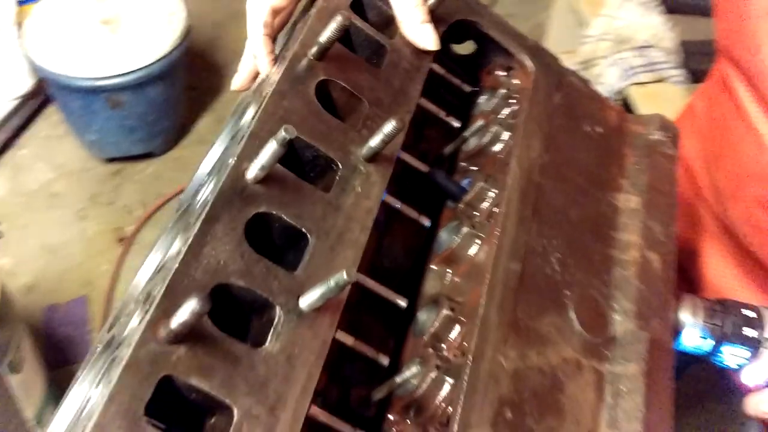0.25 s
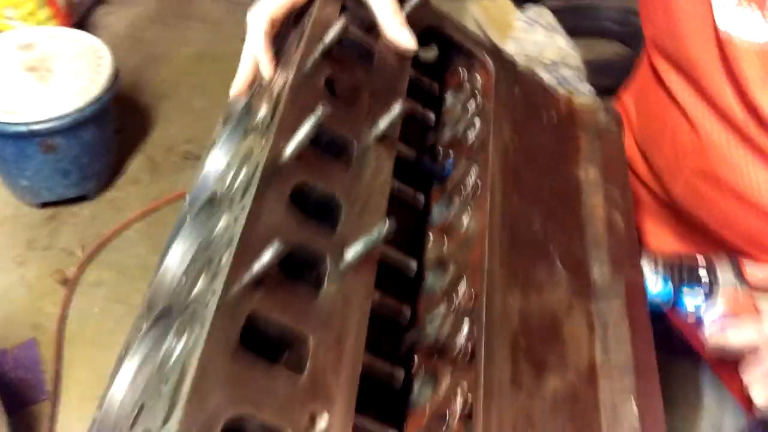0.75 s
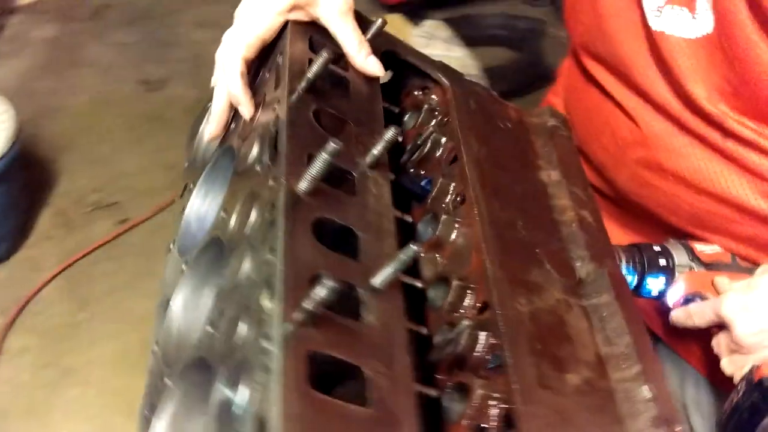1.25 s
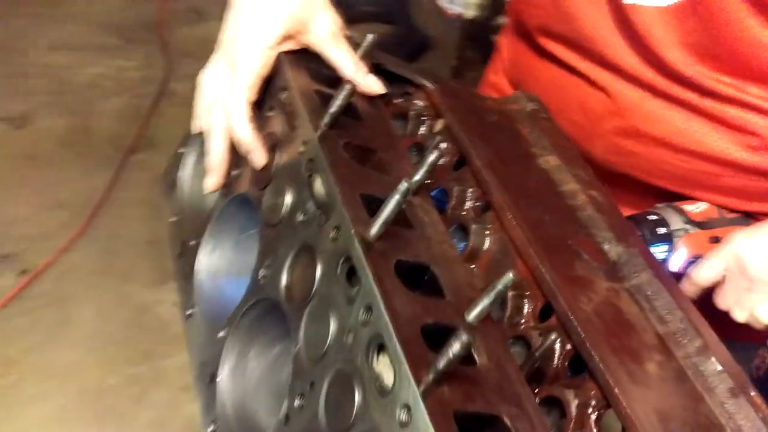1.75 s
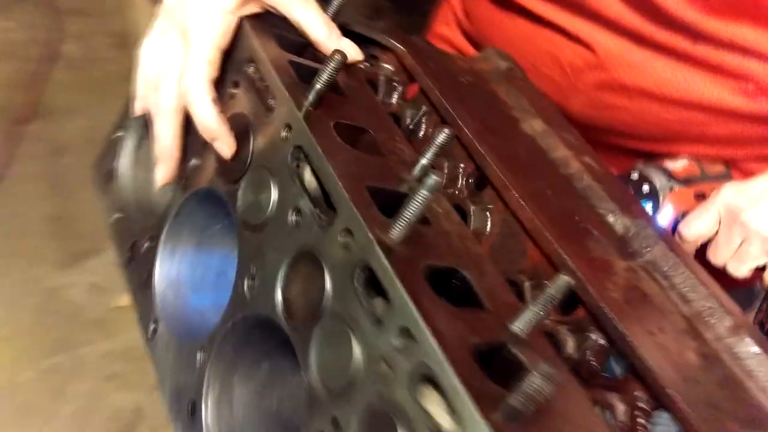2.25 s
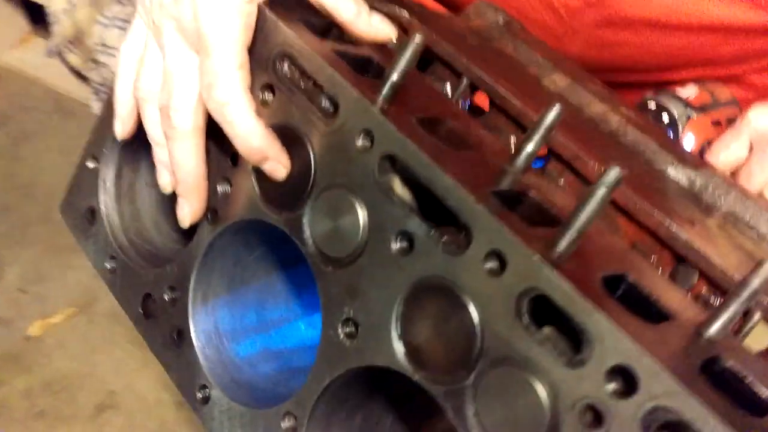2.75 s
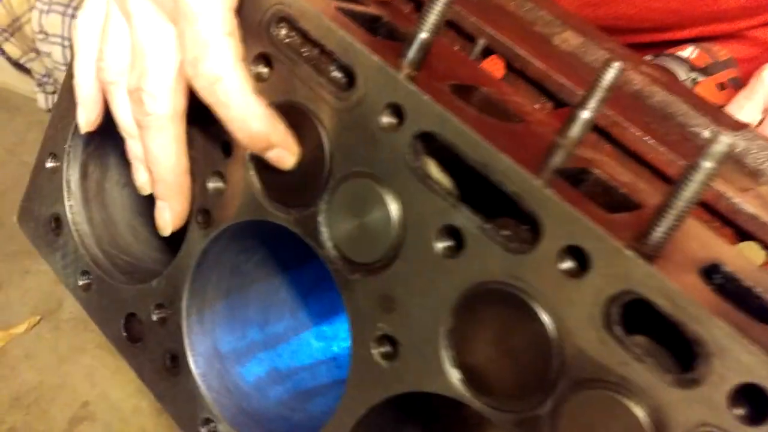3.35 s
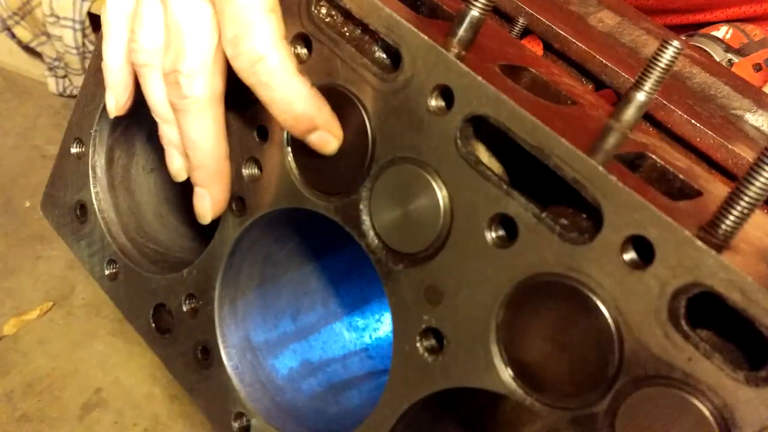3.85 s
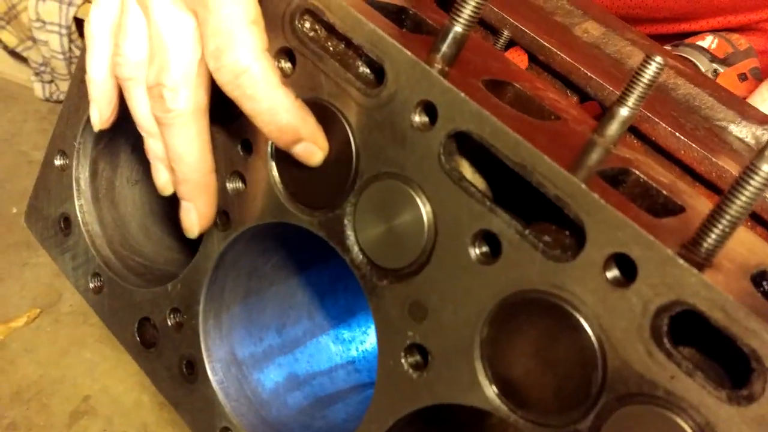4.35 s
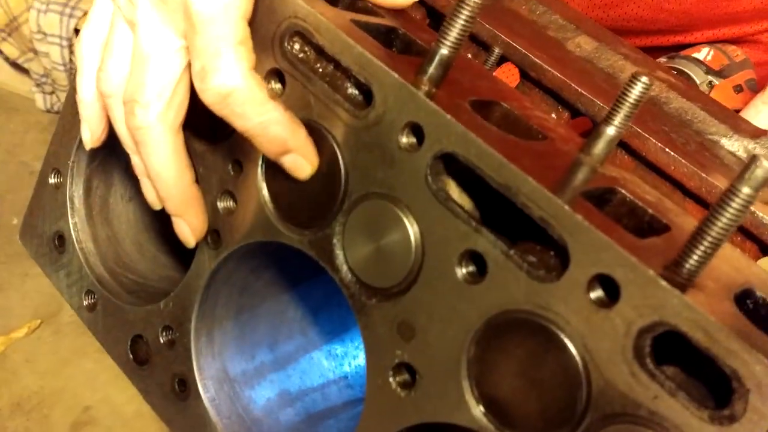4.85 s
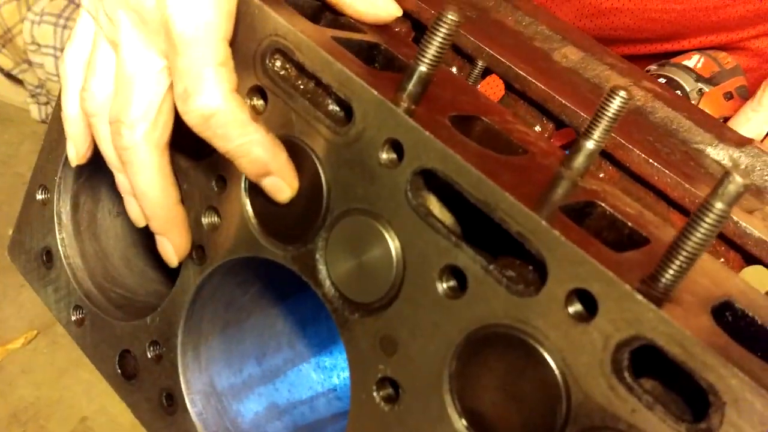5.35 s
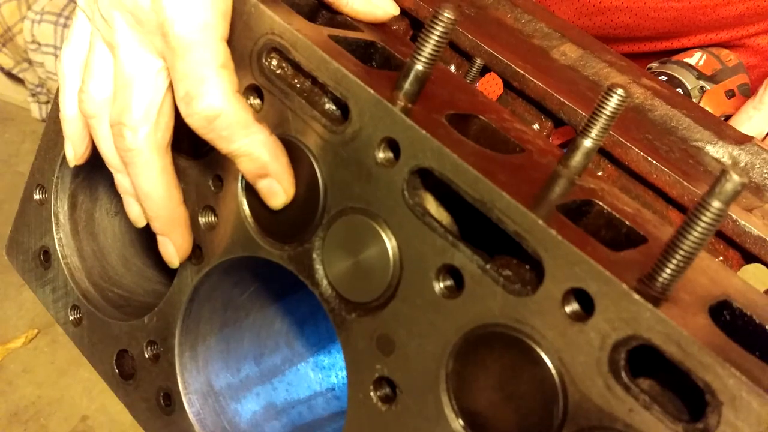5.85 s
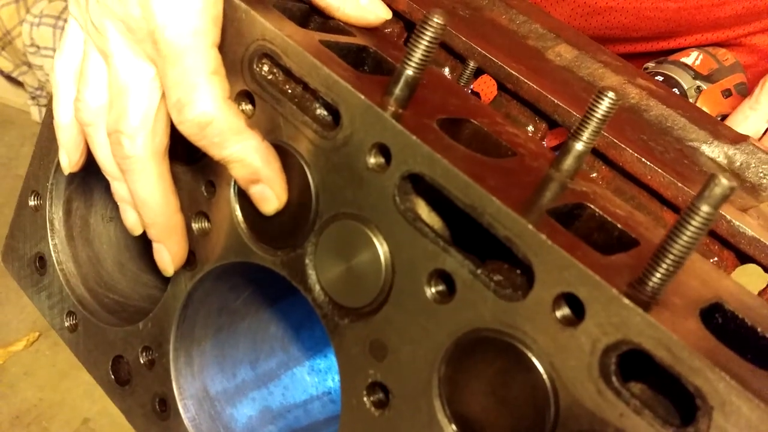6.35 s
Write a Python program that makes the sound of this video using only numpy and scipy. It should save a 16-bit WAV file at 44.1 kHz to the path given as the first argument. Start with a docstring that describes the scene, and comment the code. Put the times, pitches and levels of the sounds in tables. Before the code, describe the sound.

A cordless drill drives a honing tool inside an iron engine block, close by, with an even motor whine, a rough grinding hiss and a thin ringing tone that swells and fades. Before it starts, about two seconds in, there are only a few light shoe scrapes on concrete, a soft heel thud and small clicks over the low hum of a workshop fan. The drill then keeps running.

```python
"""A cordless drill spins up and turns a hone in the bore of an engine block.
Its motor whines at multiples of the shaft speed; brushes, fan and stones make a grinding noise,
the iron rings under the stones, and a narrow tone near 1095 Hz fades and swells. Before it starts,
shoes scuff on concrete, a heel lands and small parts tick.
A fan motor and the mains hum in the workshop throughout."""
import sys
import numpy as np
from scipy import signal
from scipy.fft import rfft, irfft, next_fast_len
from scipy.io import wavfile
from scipy.ndimage import uniform_filter1d, map_coordinates

SR = 44100
rng = np.random.default_rng(int(sys.argv[2]) if len(sys.argv) > 2 else 0)


def unload_audio(sound):
    """Save the sound as a 16-bit wav file, at the path given as the first command line argument."""
    columns = np.transpose(np.atleast_2d(sound))
    # keep every value between -1 and 1, then stretch to whole-number steps
    steps = np.round(np.clip(columns, -1, 1) * 32767)
    wavfile.write(sys.argv[1], SR, steps.astype(np.int16))


N = 290619
TIME_S = np.arange(N) / SR


def amp(db):
    """Decibels to gain."""
    return 10 ** (np.asarray(db) / 20)


def unit(x):
    """Scale to rms 1."""
    return x / np.sqrt(np.mean(x ** 2) + 1e-20)


def pan(db):
    """Stereo gains; db is left minus right."""
    return amp(np.vstack([db / 2, -db / 2]))


def along(points, hz):
    """Interpolate (frequency, value) points on a log axis."""
    freqs, values = np.transpose(points)
    return np.interp(np.log(hz + 1), np.log(freqs + 1), values)


def curves(rows):
    """One value per sample for each column after the time."""
    times, *columns = np.transpose(rows)
    return [np.interp(TIME_S, times, column) for column in columns]


def bump(centre_s, sigma_s):
    """Gaussian envelope of height 1."""
    return np.exp(-.5 * ((TIME_S - centre_s) / sigma_s) ** 2)


def wobble(rate_hz):
    """Random curve, linear between Gaussian knots."""
    knots = rng.standard_normal(int(N * rate_hz / SR) + 4)
    return map_coordinates(knots, [TIME_S * rate_hz], order=1)


def filtered(x, response):
    """Apply a complex frequency response."""
    size = next_fast_len(x.shape[-1] + 8192)
    return irfft(rfft(x, size) * response(np.fft.rfftfreq(size, 1 / SR)), size)[..., :x.shape[-1]]


def resonance(f, hz, width_hz):
    """Second-order band-pass response."""
    return 1j * f * width_hz / (hz * hz - f * f + 1j * f * width_hz)


# Left-right likeness of room noise: (frequency [Hz], correlation [1])
ROOM_COHERENCE = [(60, 0.8), (130, 0.81), (280, 0.96), (610, 0.83), (1330, 0.09), (2880, 0.091),
                  (6250, 0.1), (13600, 0.28)]


def noise(gain, length, patchy_db, coherence=ROOM_COHERENCE):
    """Shaped stereo noise of rms 1, with random time-frequency patches that dip more than they rise."""
    bins = signal.stft(rng.standard_normal((2, length + 512)), nperseg=512)[2]
    patches = uniform_filter1d(rng.standard_normal(bins.shape[1:]), size=2, axis=0)
    patches = unit(uniform_filter1d(patches, size=14, axis=1))
    pair = signal.istft(bins * amp(patchy_db * np.minimum(patches, .7)), nperseg=512)[1][:, :length]

    def mid_side(hz):
        angle = np.arccos(np.clip(along(coherence, hz), -1, 1)) / 2
        return gain(hz) * [np.cos(angle), np.sin(angle)]
    mid, side = filtered(pair, mid_side)
    return unit(np.array([mid + side, mid - side]))


# Workshop decay: (frequency [Hz], t60 [s])
ROOM_DECAY = [(200, 0.44), (2000, 0.38), (12000, 0.31)]


def reverb(x):
    """Diffuse room tail; the treble dies first."""
    hz, t, bins = signal.stft(rng.standard_normal((2, SR // 2)), SR, nperseg=256)
    tail = signal.istft(bins * amp(-60 * t / along(ROOM_DECAY, hz)[:, None]), SR, nperseg=256)[1]
    delayed = np.pad(x, ((0, 0), (200, 0)))
    return signal.fftconvolve(delayed, tail / np.linalg.norm(tail[0]), axes=1)[:, :N]


# Room fan, louder when nearer: (time [s], level [dB])
FAN_LEVEL = [(0.0, -52), (0.3, -48.5), (1.35, -49), (1.6, -52.5), (6.59, -53)]
# Faint tones: (frequency [Hz], level [dB], phase jitter [rad])
DRONES = [(59, -71, .3), (157, -67, 1.6)]
# Room noise: (frequency [Hz], relative density [dB])
AIR_SPECTRUM = [(15, -18.5), (30, -35), (45, -30), (65, -35), (90, -24.5), (200, -17.5), (330, -21),
                (615, -23.5), (880, -23.5), (1120, -29.5), (2300, -34), (6000, -47), (13000, -55)]


def room_tone(fan_hz=216.4, mains_hz=59.9):
    """A wavering fan motor, hum at twice the mains frequency, faint drones and hiss."""
    fan_db, = curves(FAN_LEVEL)
    rad_per_hz = 2 * np.pi * TIME_S
    fan_gain = amp(fan_db + 0.46 * wobble(24.8))
    fan = fan_gain * np.sin(fan_hz * rad_per_hz + 0.57 * wobble(23) + np.array([[.15], [-.15]]))
    hum = amp(-59.5 + 1.6 * wobble(15)) * np.sin(2 * mains_hz * rad_per_hz + 0.33 * wobble(18))
    drones = sum(amp(db) * np.sin(hz * rad_per_hz + jitter * wobble(18)) for hz, db, jitter in DRONES)
    air = amp(-53.5) * noise(lambda hz: amp(along(AIR_SPECTRUM, hz)), N, patchy_db=2.5)
    return np.sqrt(2) * (fan * pan(-2.1) + (hum + drones) * pan(-1.1)) + air * pan(-2.2)


# Shoe drags: (time [s], level [dB], rise [s], tilt [dB/octave], pan [dB])
SCUFFS = [(0.021, -60.5, 0.0097, 1, -3), (0.283, -45.5, 0.0018, 0.5, -3.5), (.87, -55, 0.049, -3, -5),
          (0.92, -58, 0.013, 9, 1), (1.171, -57, 0.032, -1, -3), (1.265, -60, 0.0092, -8, -12),
          (1.546, -64.5, 0.0068, -5.5, -8), (1.746, -43, .004, -2, -2), (1.759, -40.5, 0.028, -5, -3.5),
          (1.878, -61, .01, -7, -2), (2.009, -62.5, 0.0032, 0, -4), (2.254, -50, 0.012, -1, -2.5)]
# Sole on concrete: (frequency [Hz], relative density [dB])
SOLE_SPECTRUM = [(350, -40), (900, -36), (1500, -22), (2300, -17), (3300, -14), (4500, -18), (9000, -21),
                 (13300, -29)]


def scuffs(hold_s=0.022, t60_s=0.32):
    """Soles drag on concrete: gritty noise swells, holds and dies away."""
    out, t = np.zeros((2, N + SR)), np.arange(SR // 2) / SR
    for start_s, db, rise_s, tilt_db, pan_db in SCUFFS:
        drag = noise(lambda hz: amp(along(SOLE_SPECTRUM, hz) + tilt_db * np.log2((hz + 300) / 3000)),
                     len(t), patchy_db=4.0)
        envelope = np.clip(t / rise_s, 0, 1) * amp(-60 * np.maximum(t - rise_s - hold_s, 0) / t60_s)
        grain = amp(0.94 * wobble(873)[:len(t)])
        out[:, round(start_s * SR):][:, :len(t)] += amp(db) * pan(pan_db) * envelope * drag * grain
    return out[:, :N]


# Floor modes: (frequency [Hz], relative level [dB], t60 [s])
FLOOR_MODES = [(133, 0.5, 0.13), (272, -9, 0.38), (397, -4.5, 0.091)]


def heel(start_s=.514, gain_db=-35, rise_s=0.0033):
    """A heel lands softly and excites the floor's low modes."""
    out, t = np.zeros(N), np.arange(SR // 4) / SR
    thud = sum(amp(db - 60 * t / t60) * np.sin(2 * np.pi * hz * t) for hz, db, t60 in FLOOR_MODES)
    out[round(start_s * SR):][:len(t)] = amp(gain_db) * (1 - np.exp(-t / rise_s)) * thud
    return out


# Contacts and rebounds: (time [s], gain [dB], pan [dB], tilt [dB/octave])
TICKS = [(0.7048, -37.5, -3, 1.5), (0.708, -43, -3.5, -4), (.7148, -45.5, -7, -8), (1.2277, -43, -1, -5.5),
         (1.2626, -35, -4, -5), (1.265, -39, 0, -2.5), (1.2733, -45, -1, -6)]
# Modes of a small part: (frequency [Hz], relative level [dB], t60 [s])
PART_MODES = [(950, -15, 0.016), (1380, -6.5, 0.012), (2260, 1, 0.013), (3120, 0, 0.012),
              (3960, 7.5, 0.0081), (5100, 0, 0.008), (6900, 3.5, 0.0065), (8000, -8, 0.0068),
              (10500, -19, .006)]


def ticks(scatter_db=1.8, rise_s=0.00078, crack_t60_s=0.026):
    """Small hard parts strike: a noise crack and a short ring, with reverb."""
    out, t = np.zeros((2, N)), np.arange(SR // 4) / SR
    attack = 1 - np.exp(-t / rise_s)
    for start_s, db, pan_db, tilt_db in TICKS:
        ring = np.zeros(len(t))
        for hz, mode_db, t60 in PART_MODES:
            struck_db = mode_db + tilt_db * np.log2(hz / 3000) + scatter_db * rng.normal()
            ring += amp(struck_db - 60 * t / t60) * np.sin(2 * np.pi * hz * t)
        crack = filtered(rng.standard_normal((2, len(t))),
                         lambda f: resonance(f, 3600, 3300) * amp(tilt_db * np.log2((f + 1) / 3000)))
        crack *= 3 * amp(-60 * t / crack_t60_s)
        out[:, round(start_s * SR):][:, :len(t)] += amp(db) * pan(pan_db) * attack * (ring + crack)
    return out + amp(-2.5) * reverb(out)


TRIGGER_S, KNEE_S, FULL_HZ = 2.379, 2.495, 373.3
# Shaft speed still lacking at the knee: (deficit [Hz], time constant [s])
CREEP = [(66, .055), (20.5, .32)]


def spin_up():
    """Shaft speed in Hz: a linear climb from trigger to knee, then a creep to full speed."""
    since_knee_s = np.maximum(TIME_S - KNEE_S, 0)
    deficit_hz = sum(hz * np.exp(-since_knee_s / tau_s) for hz, tau_s in CREEP)
    return (FULL_HZ - deficit_hz) * np.clip((TIME_S - TRIGGER_S) / (KNEE_S - TRIGGER_S), 1e-6, 1)


# Motor orders 1, 2, ... at full speed: (left level [dB], right level [dB], left lead [rad])
ORDERS = [(-43, -44, .1), (-51, -53, -.5), (-54, -52, 1.2), (-62, -49, 3.0), (-47, -42, 1.3),
          (-51, -45, .2), (-52, -46, 2.5), (-54, -50, .6), (-45, -48, -2.6), (-41, -36, -.3),
          (-50, -48, -2.1), (-55, -54, 2.2), (-62, -62, -.5), (-54, -53, -.3), (-41, -37, 1.8),
          (-54, -57, .3), (-56, -62, 1.3), (-52, -55, .8), (-52, -57, .2), (-43, -48, 1.9),
          (-55, -60, -2.2), (-51, -52, -.2), (-58, -61, -.3), (-60, -61, .2), (-56, -59, 1.1),
          (-56, -54, .6), (-53, -53, 1.1), (-48, -49, 1.3), (-57, -54, -1.3), (-41, -40, -2.1),
          (-57, -56, -2.2), (-56, -55, -.3), (-56, -56, .3)]
# Single motor orders swell and fade, during spin-up and at full speed:
# (order [1], time [s], sigma [s], left gain [dB], right gain [dB])
ORDER_SWELLS = [(1, 2.3, 0.13, -3, -5), (1, 3, 0.081, 3.5, 2), (2, 2.47, 0.14, 4, 9),
                (2, 3.05, 0.14, -14, -10), (2, 6.9, 1, 2, 2), (6, 5.7, .7, 6, 2.5), (5, 3.2, 0.85, 1, 3),
                (5, 5.2, 0.66, 1, -3.5), (10, 2.5, 0.21, 1, -2), (10, 3.97, 0.28, -0.5, -5.5),
                (10, 4.8, .6, 2.5, 2.5), (10, 6.32, 0.077, -12, -6), (15, 3.06, 0.3, -4, -8),
                (15, 3.64, 0.45, 5, -1), (15, 4.09, 0.38, 1.5, 5.5), (15, 4.9, 0.13, -9, -1),
                (15, 5.4, 0.12, 1, -9), (15, 6.1, 0.33, -5, -3), (20, 3.53, 0.11, 6, 6),
                (20, 6.24, 0.48, 7.5, -10), (28, 6.1, 0.33, 4, 7), (30, 2.52, .09, -4, -8),
                (2, 2.46, 0.036, -12, -12), (10, 3.32, .12, 0, -2), (28, 3.4, .25, 6.5, -10),
                (30, 2.4, 0.67, 8.5, 7.5), (30, 3.9, 0.082, 0, -3), (30, 6.0, 0.21, -9, 3.5),
                (30, 5.1, 0.27, -2.5, -1.5), (10, 5.65, 0.17, 0.5, 1.5), (5, 2.7, .2, 2, 1)]
SHIFTING_ORDERS = (5, 6, 10, 15, 30)
# Shifting left-right phase: (time [s], left lead [rad] for each of SHIFTING_ORDERS)
SHIFTING_LEADS = [(2.6, 0, .8, -2.5, 0, -2.2), (3.0, -.6, .9, -2.5, -.8, -3),
                  (3.3, 1.2, -.4, -1.3, 0, -2.6), (3.6, 1, .8, .6, .2, -2.8), (3.95, .9, .3, .8, .6, -2.5),
                  (4.15, 1.1, 2, .1, .9, -1.8), (4.5, 1, 1.2, .2, .8, -1.3), (4.62, 1, .4, .3, 1.2, -3.2),
                  (5.0, 1.2, 0, .3, 1.5, -3), (5.35, 1.4, 0, .6, 2.3, -.6), (5.7, 1.6, 0, .3, 3.6, -.5),
                  (5.95, 1.7, .2, -.3, 2.4, -.5), (6.3, 1.8, 1.5, -.8, 3.4, 1.2),
                  (6.59, 1.6, .8, .7, 3, .6)]


def motor_whine(speed_hz, angle, drift_db=.7, flutter_db=1.8, waver_db=1.2):
    """Multiples of the shaft speed, each reaching left and right by its own changing paths."""
    tones = np.zeros((2, N))
    swing_s = 2e-5 * (TIME_S - 4.5)  # the left path shortens against the right
    leads = dict(zip(SHIFTING_ORDERS, curves(SHIFTING_LEADS)))
    shortfall = 1 - speed_hz / speed_hz.max()
    for order, (left_db, right_db, base_lead) in enumerate(ORDERS, 1):
        loose = min((order - 1) / 8, 1)  # higher orders' paths shift more
        gain_db = drift_db * loose * np.array([wobble(3.34), wobble(2.9)])
        for swell_order, centre_s, sigma_s, *swell_db in ORDER_SWELLS:
            if swell_order == order:
                gain_db += np.outer(swell_db, bump(centre_s, sigma_s))
        gain_db -= (70 / order ** 4 + 80 * loose) * shortfall  # forces grow steeply with speed
        phase = order * angle + rng.uniform(0, 2 * np.pi)
        gain_db += (1 - loose) * waver_db * wobble(12)
        lead = leads.get(order, base_lead + 2 * np.pi * order * FULL_HZ * swing_s)
        for side, db in enumerate((left_db, right_db)):
            jitter = loose * (.25 * wobble(3.21) + 0.72 * wobble(40))
            level_db = db + gain_db[side] + flutter_db * loose * wobble(30)
            tones[side] += np.sqrt(2) * amp(level_db) * np.sin(phase - side * lead + jitter)
    return tones


def mode_ripple(hz, depth_db=1.7, spacing_hz=30):
    """Finely uneven response of crowded block and room modes; left and right share it in the bass."""
    shared, *own = [np.interp(hz / spacing_hz, np.arange(row.size), row)
                    for row in rng.standard_normal((3, 2000))]
    apart = np.clip(hz / 2500, 0, .7)
    return amp(depth_db * (np.sqrt(1 - apart ** 2) * shared + apart * np.array(own)))


# Brush, fan and stone noise: (frequency [Hz], relative density [dB])
GRIND_SPECTRUM = [(150, -82), (300, -19.5), (480, -20.5), (850, -14), (1100, -6.5), (1900, -7),
                  (2350, -3.5), (2700, -5), (3200, -8.5), (3700, -7), (4400, -8.5), (5300, -5), (7500, -8),
                  (8500, -12), (10100, -14.5), (12700, -16.5)]
# Its left-right likeness: (frequency [Hz], correlation [1])
GRIND_COHERENCE = [(280, 0.88), (700, 0.89), (1330, 0.032), (3200, 0.042), (4700, 0.74), (6250, 0.11),
                   (10000, 0.05), (13000, 0.33)]
# Its balance: (frequency [Hz], pan [dB])
GRIND_PAN = [(300, .5), (700, 0), (1200, -2), (2500, -2), (4500, 0), (7400, 3), (10000, 0), (13000, -.5)]
# Its comb at the motor orders: (frequency [Hz], depth [dB])
GRIND_COMB = [(900, -1), (1800, -1), (3300, 4), (4300, 1.5), (5000, -0.5), (6000, -1.5), (8500, 1),
              (10300, 2.5), (12500, -4.5)]
# Its left-right phase: (frequency [Hz], left lead [rad])
GRIND_LEAD = [(800, 0), (4650, 6.1), (5940, 6.6), (8180, 11.8), (13300, 19)]


def grinding(angle):
    """Brush, fan and stone noise pulses and partly repeats each turn, so it gathers at the orders."""
    def colour(hz):
        comb = amp(along(GRIND_COMB, hz) * np.cos(2 * np.pi * hz / FULL_HZ))
        lead = np.interp(hz, *np.transpose(GRIND_LEAD))
        return pan(along(GRIND_PAN, hz)) * mode_ripple(hz) * comb * np.exp(np.outer([.5j, -.5j], lead))
    grit = noise(lambda hz: amp(along(GRIND_SPECTRUM, hz)), N, patchy_db=4.0, coherence=GRIND_COHERENCE)
    return filtered(grit * (1 + 0.15 * np.sin(angle)), colour)


def shell_cry(speed_hz, angle, order=10, hz=2220, width_hz=670, peak_db=-30):
    """One motor order cries out as it climbs through the resonance of the drill's shell."""
    gain = amp(peak_db) * np.abs(resonance(order * speed_hz, hz, width_hz)) ** 3
    return gain * np.sin(order * angle) * np.ones((2, 1))


# Bore and block modes: (frequency [Hz], width [Hz], relative level [dB])
BLOCK_MODES = [(988, 87, -14.5), (3870, 30, -16.5), (5185, 110, -12)]


def block_ring():
    """The iron rings under the stones in narrow bands of noise."""
    return sum(amp(db) * noise(lambda f: np.abs(resonance(f, hz, width_hz)) ** 2, N, patchy_db=1.5)
               for hz, width_hz, db in BLOCK_MODES)


# Brief swells of a narrow ringing tone near 1095 Hz: (time [s], sigma [s], level [dB])
RING_SWELLS = [(2.75, 0.084, -46), (3.275, 0.015, -39), (3.393, 0.033, -36.5), (3.496, .025, -38),
               (3.664, 0.016, -36), (3.747, .045, -33.5), (4.062, 0.012, -34), (4.31, 0.02, -34),
               (4.427, 0.019, -33.5), (4.523, 0.021, -40), (4.628, 0.017, -36.5), (4.72, 0.014, -33),
               (4.8, 0.028, -36.5), (4.966, 0.014, -38), (5.107, 0.035, -44), (5.46, .025, -37),
               (5.542, 0.022, -33), (5.627, 0.021, -37.5), (5.803, 0.013, -37.5), (5.9, .035, -34.5),
               (6.1, .025, -43), (6.223, .022, -36), (6.36, .035, -39), (6.474, .035, -38.5),
               (6.55, .025, -38)]


def ringing_tone(angle, cycles_per_turn=2.935, turns_per_flutter=15.6, base_db=-48.5):
    """A narrow ringing tone near 1095 Hz that fades, swells and flutters at about 24 Hz."""
    phase = cycles_per_turn * angle + wobble(30) + np.array([[.45], [-.45]])
    tone = np.sin(phase + 0.26 * np.array([wobble(13), wobble(12)]))
    fading = amp(base_db) * np.hypot(wobble(18), wobble(18))
    swells = sum(amp(db) * bump(centre_s, sigma_s) for centre_s, sigma_s, db in RING_SWELLS)
    swells *= amp(3.9 * wobble(45))
    flutter = 1 + 0.29 * np.sin(angle / turns_per_flutter + 1.3 * wobble(4.4))
    return (fading + swells) * tone * flutter * pan(0.53)


# Shaft speed under shifting load: (time [s], offset [Hz])
LOAD_OFFSET = [(3.3, 0), (3.65, -.9), (4.05, -.8), (4.6, 0), (5.3, .4), (5.8, 0), (6.25, -.7), (6.59, -.4)]


def drill(db_per_decade=14, bite_db=5):
    """The motor turns the hone; whine, grinding and ringing grow louder with speed."""
    nominal_hz = spin_up()
    speed_hz = nominal_hz + 0.302 * wobble(25) + curves(LOAD_OFFSET)[0]
    angle = 2 * np.pi * np.cumsum(speed_hz) / SR
    speed_ratio = nominal_hz / FULL_HZ
    bite = speed_ratio ** 6  # the stones bite only near full speed
    effort = amp(db_per_decade * np.log10(speed_ratio) - bite_db * (1 - bite))
    whine = motor_whine(speed_hz, angle)
    cry = shell_cry(speed_hz, angle)
    honing = amp(-30) * (amp(1.64) * grinding(angle) + bite * block_ring())
    ring = bite ** 2 * ringing_tone(angle)
    return effort * (whine + honing) + ring + cry + amp(0.5) * reverb(cry)


def scene():
    """Stereo mix of the workshop."""
    return drill() + scuffs() + ticks() + heel() + room_tone()


def record(dry):
    """Brick-wall low-pass at 13.1 kHz."""
    return filtered(dry, lambda hz: hz < 13100)


dry = scene()
out = record(dry)
unload_audio(out)
```